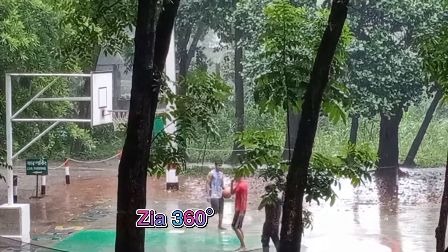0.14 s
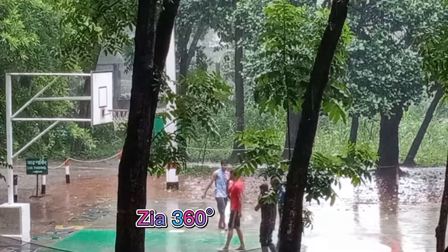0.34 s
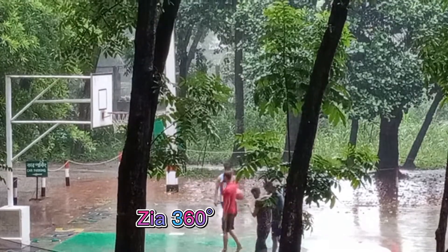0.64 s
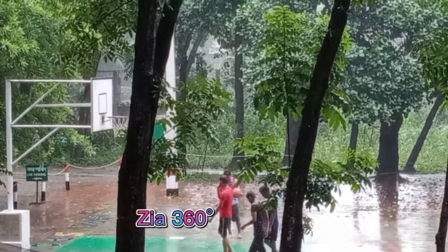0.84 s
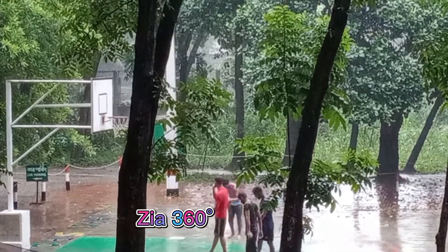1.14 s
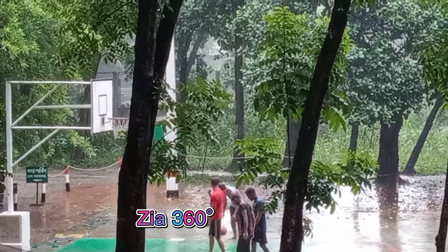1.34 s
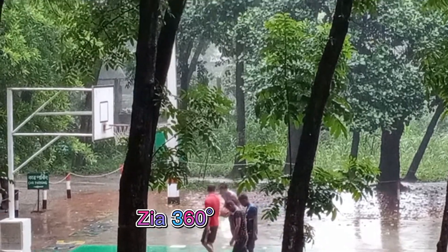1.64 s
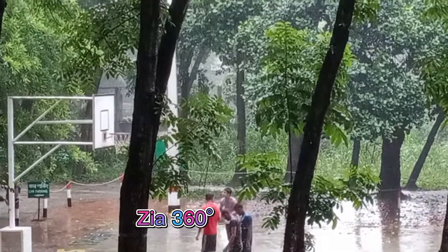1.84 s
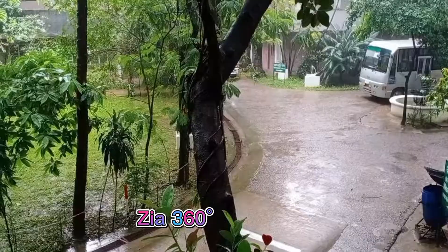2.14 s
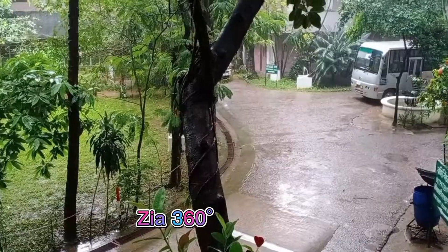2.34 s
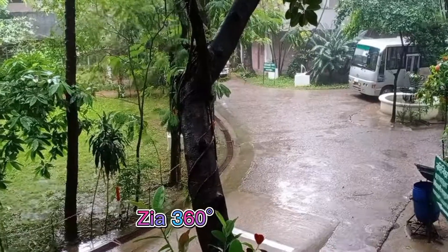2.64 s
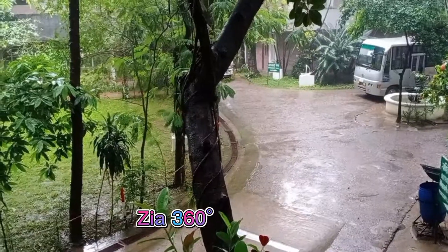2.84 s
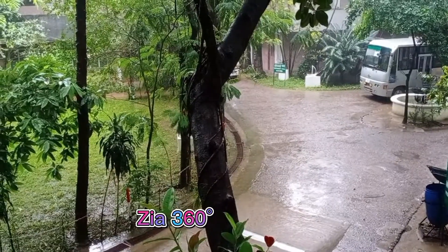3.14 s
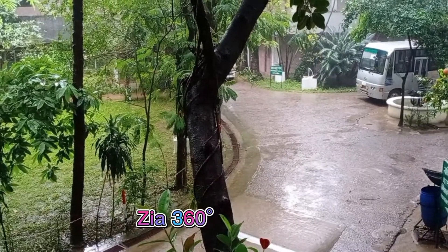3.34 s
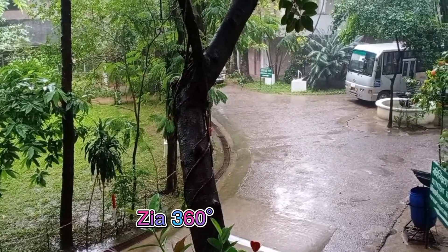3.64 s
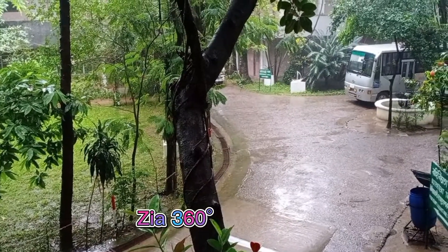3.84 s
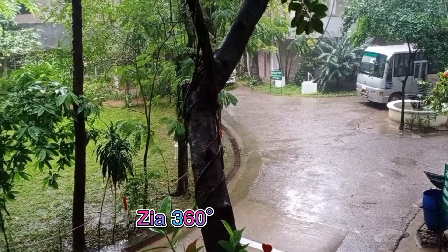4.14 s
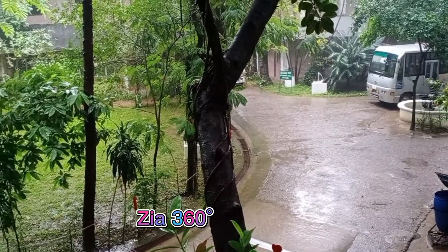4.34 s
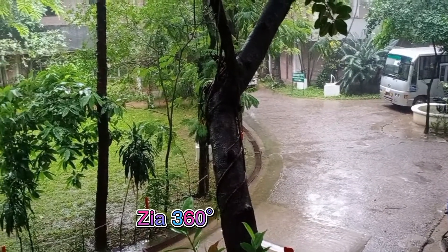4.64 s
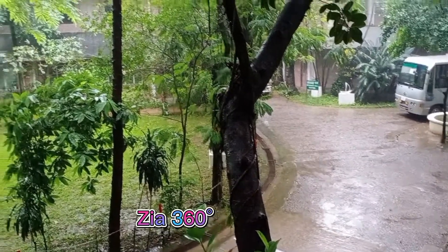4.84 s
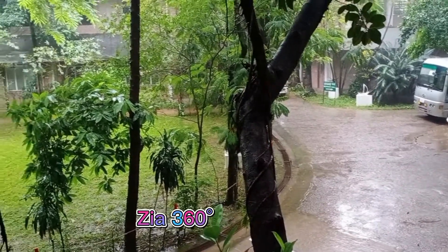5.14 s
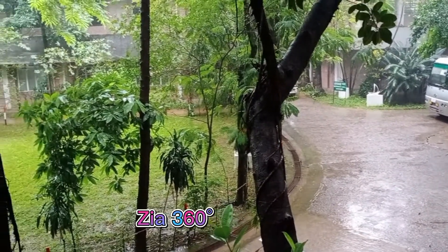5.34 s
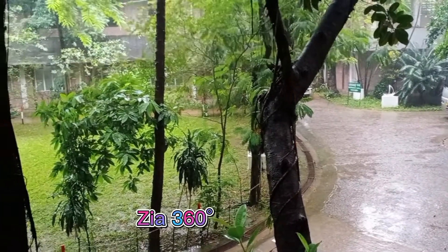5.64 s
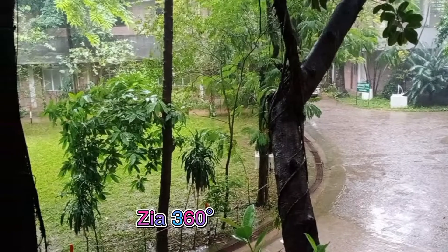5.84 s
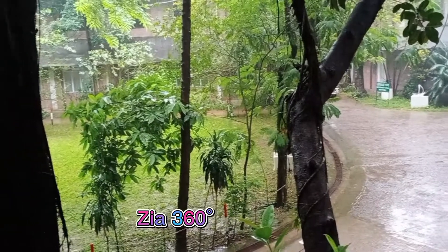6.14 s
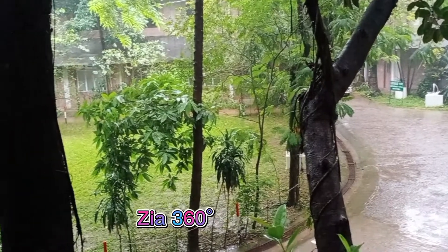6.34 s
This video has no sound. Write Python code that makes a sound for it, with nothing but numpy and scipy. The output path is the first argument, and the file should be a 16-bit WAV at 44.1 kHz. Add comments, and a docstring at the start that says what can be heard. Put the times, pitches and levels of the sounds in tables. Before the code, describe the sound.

Torrential rain fills the whole stretch of about 6.4 seconds without pause, equal in both channels. At first, beside a flooded court, a bright, airy hiss of drops on leaves covers a fine watery babble and a dark, distant roar. A fat drip smacks sharply near the microphone at 0.2, the loudest of all; small plops follow. At about 1.2 a faint hollow knock sounds across the court with quick echoes and a faint tail, near a light slap. At 1.7 the place changes abruptly to a driveway: the hiss grows a little louder with less airy top, the bubbling deeper and fuller. Close drips tick at 2.0, 2.5, 3.1, 4.2 and 4.5. Wet slaps cluster between 2.0 and 2.9, then return sparsely near 3.8, 4.8, 5.7 and 6.2. Rounded plops crowd around 5.6 to 5.8. Soft dull bumps lie underneath, and rain continues to the end.

```python
"""Torrential rain hisses all around in a garden: first beside a flooded ball court, then beside a driveway. The
hiss is noise and random ticks shaped like wet leaves; bubbles ringing in many bands babble in standing water.
Close to the microphone fat drips smack leaves, big bubbles plop, and heavy drops slap and splat on wet ground.
Farther off, bands of noise make a dark roar, short low tones bump dully, puddles glug now and then, and three
ringing modes knock once across the court, with echoes. Both channels are alike."""
import sys
import numpy as np
from scipy import signal
from scipy.fft import rfft, irfft, next_fast_len
from scipy.io import wavfile

SR = 44100
rng = np.random.default_rng(int(sys.argv[2]) if len(sys.argv) > 2 else 0)


def inscribe(sig):
    """Save sig as 16-bit PCM at rate SR to the path in sys.argv[1].

    A 1-D sig is mono; a 2-D sig holds one channel per row.
    Samples are clipped to [-1, 1] before scaling.
    """
    pcm = np.round(np.clip(np.atleast_2d(sig).T, -1, 1) * 32767)
    wavfile.write(sys.argv[1], SR, pcm.astype(np.int16))


N = 285311   # length in samples
STEP = 100   # samples between ticks
TICKS = np.arange(0, N + STEP, STEP) / SR   # the times in seconds at which slow controls are worked out
HALF_SECOND = SR // 2   # in samples
MOVE_S = 1.695   # the listening place changes from court to driveway

# Far roar of rain on the ground. Each row: frequency in Hz, level in dB per Hz before the trim for each place.
ROAR_SPECTRUM = [(40, -95), (60, -95), (95, -87), (140, -86), (230, -84.5), (350, -85), (480, -88),
                 (700, -84), (1400, -90.5)]
# Dull bumps underneath, and a few low glugs in the puddles (the rows near 300-420 Hz). # Each row: start in
# seconds, peak level in dB, length in seconds, middle pitch in Hz.
DULL_BUMPS = [(0.079, -54, .1, 90), (0.27, -50, 0.041, 90), (0.731, -55, 0.07, 85),
              (0.746, -47, 0.054, 402), (1.169, -39.5, 0.038, 99), (1.247, -48, 0.064, 106),
              (1.595, -48, 0.028, 115), (1.882, -45, .05, 330), (3.055, -43, 0.12, 230),
              (3.16, -38.5, 0.038, 105), (3.188, -44, 0.066, 110), (3.228, -48, 0.054, 174),
              (3.256, -43.5, 0.036, 90), (3.398, -43, 0.05, 104), (3.434, -48, 0.05, 317),
              (3.888, -45.5, 0.086, 226), (4.674, -47, 0.045, 122), (4.79, -43, 0.031, 162),
              (4.807, -46, 0.058, 109), (4.868, -40, 0.036, 157), (5.348, -40.5, 0.04, 93),
              (5.358, -44, 0.032, 168), (5.46, -50, 0.049, 115), (5.613, -50, 0.053, 95),
              (6.003, -48, 0.082, 321), (6.277, -46.5, 0.065, 169), (6.28, -50, 0.15, 100.5)]
# The hollow knock across the court: its start, and how hard it sets the modes ringing.
KNOCK_S, KNOCK_DRIVE_DB = 1.1762, -25.5
# Modes of the knocked body. Each row: pitch in Hz, relative level in dB, time to fall by 60 dB in seconds.
HOLLOW_MODES = [(1110, -1, 0.05), (1200, -4, 0.021), (1320, 2, 0.025)]
# Echoes of the knock. Each row: delay in seconds, level in dB relative to the knock.
WALL_ECHOES = [(0.015, -10), (.025, -11), (0.039, -11), (.057, -9), (.083, -10), (.097, -12), (0.106, -10)]

# Big bubbles in puddles. Each row: start in seconds, peak level in dB, middle pitch in Hz, length in seconds.
PUDDLE_PLOPS = [(0.26, -41, 1170, 0.027), (.4, -50, 846, 0.046), (.59, -44.5, 1027, 0.05),
                (.665, -41, 1630, .03), (0.732, -53.5, 1080, 0.17), (0.822, -39, 1580, 0.039),
                (0.822, -46.5, 796, 0.047), (0.924, -47, 884, .06), (1.206, -37, 1110, 0.026),
                (1.29, -48, 604, 0.037), (1.591, -39, 1457, .035), (1.743, -41, 899, 0.04),
                (1.89, -36.5, 1159, .05), (2.611, -36, 1293, 0.035), (2.82, -39, 1665, .04),
                (3.11, -42, 1034, .04), (3.197, -37, 960, .05), (3.473, -36, 1003, .05),
                (3.54, -40, 1291, 0.044), (4.31, -39, 1679, .04), (4.327, -44, 738, 0.1),
                (4.389, -36, 1240, 0.029), (4.788, -36, 1012, .04), (4.851, -34, 1755, 0.033),
                (5.149, -38, 956, 0.037), (5.33, -38.5, 748, 0.088), (5.409, -38, 1570, 0.038),
                (5.6, -35, 960, 0.034), (5.675, -33, 1180, 0.058), (5.722, -35.5, 914, 0.065),
                (5.788, -33, 877, 0.024), (5.985, -35, 1830, 0.024), (6.403, -35, 1234, 0.035)]
# The heaviest drops on wet ground. Each row: start in seconds, peak level in dB, pitch in Hz,
# time in seconds for the spatter to fall by 60 dB.
GROUND_SLAPS = [(1.232, -33, 1380, .04), (1.96, -28.5, 1340, 0.095), (2.109, -25, 1370, 0.036),
                (2.349, -29, 1250, 0.035), (2.556, -29, 1750, 0.11), (2.658, -24, 1710, .07),
                (2.663, -24.5, 1260, 0.34), (2.747, -25, 1540, .06), (2.873, -28, 1330, .03),
                (3.754, -30, 1370, .07), (4.493, -30, 1325, .03), (4.828, -25, 1270, 0.071),
                (5.718, -25.5, 1390, .07), (6.202, -28.5, 1130, 0.061)]

# Bubbles in the standing water at each place. Each row: frequency in Hz, level in dB per Hz before the slow fades.
COURT_WATER_SPECTRUM = [(550, -84), (800, -71.5), (1080, -73.5), (1250, -75), (1580, -70.5), (1900, -74.5),
                        (2200, -73), (2900, -77.5), (3400, -80.5)]
DRIVE_WATER_SPECTRUM = [(550, -71.5), (750, -71), (950, -70.5), (1280, -66), (1780, -70.5), (2100, -75.5),
                        (2550, -77), (3400, -77.5)]
# Spells in which the babble reaches deeper (-) or thins out (+).
# Each row: middle in seconds, length in seconds, shift of the babble's lower edge in octaves.
BABBLE_SPELLS = [(0.453, 0.2, -0.58), (0.75, 0.22, 0.4), (0.93, 0.22, 0.34), (1.1, .12, -.12),
                 (1.287, 0.065, -0.32), (1.77, .08, -.25), (1.984, 0.25, -0.26), (2.196, .1, 0.55),
                 (2.93, 0.1, 0.5), (3.527, .12, -0.34), (4.666, 0.29, 0.33), (4.935, 0.15, 0.23),
                 (5.68, .09, -.2), (5.82, .18, .14), (6.41, .14, -.25)]
COURT_BABBLE_DB, DRIVE_BABBLE_DB = 0.0, -0.29   # trim at each place
COURT_EDGE_HZ, DRIVE_EDGE_HZ = 1050, 744   # the babble's lower edge: below this pitch it fades steeply
EDGE_WANDER_OCTAVES, EDGE_WANDER_HZ = 0.053, 7.7   # that edge wanders by chance, about this often a second
# The small, high bubbles are fuller for a while, around this moment.
FIZZ_S, FIZZ_SPREAD_S, FIZZ_DB, FIZZ_ABOVE_HZ = 1.82, 0.32, 2.5, 1600

# Fat drips close by. Each row: start in seconds, peak level in dB before flicker and hollows.
CLOSE_DRIPS = [(0.0252, -27), (0.2205, -12.5), (0.7841, -25.5), (0.9971, -29), (1.1634, -28), (1.1706, -24),
               (1.5403, -28), (2.0436, -21.5), (2.5233, -27), (2.5458, -20.5), (3.0562, -25),
               (3.1345, -23.5), (3.1395, -24), (3.9654, -27), (4.1843, -22), (4.1898, -24), (4.4106, -22),
               (4.5496, -22), (4.9096, -27), (6.3546, -26)]
# Colour of the rain on the leaves at each place. Each row: frequency in Hz, relative level in dB per Hz.
COURT_LEAF_SPECTRUM = [(1500, -29.5), (2400, -15.5), (3300, -8.5), (3800, -4.5), (5000, -7.5), (5800, -3),
                       (6700, -4), (7800, -16), (9200, -32), (10200, -29.5), (11400, -33.5), (13000, -21),
                       (15500, -22)]
DRIVE_LEAF_SPECTRUM = [(1500, -39), (2700, -21), (3500, -4.5), (4900, -2), (5600, 0.5), (6400, -7.5),
                       (7500, -21), (8700, -33.5), (9350, -55.5), (10800, -35), (11400, -38.5),
                       (12500, -27.5), (15500, -37)]
COURT_HISS_DB, DRIVE_HISS_DB = -39, -35.5   # middle level at each place
# Hiss and babble swell a little together, about this often a second.
SWELL_HZ, HISS_SWELL_DB, BABBLE_SWELL_DB = 1, 0.36, 0.15

CUTOFF_HZ = 15600   # top of the recorded range


def from_db(db):
    """Decibels to gain."""
    return 10 ** (np.asarray(db) / 20)


def rms_one(x):
    """Scale to rms 1."""
    return x / np.sqrt(np.mean(x ** 2) + 1e-20)


def at_hz(points, hz):
    """Read a spectrum on a log-frequency axis."""
    table_hz, table_db = np.array(points).T
    return np.interp(np.log(np.maximum(hz, 1)), np.log(table_hz), table_db)


def colour(x, spectrum):
    """Causal (minimum-phase) filter: the spectrum's cepstrum is folded onto positive time."""
    size = 2 * next_fast_len(N // 2 + SR // 10, real=True)
    freqs = np.arange(size // 2 + 1) * SR / size
    cepstrum = irfft(np.log(from_db(at_hz(spectrum, freqs))))
    cepstrum[1:size // 2] *= 2
    cepstrum[size // 2 + 1:] = 0
    return irfft(rfft(x, size) * np.exp(rfft(cepstrum)))[:N]


def narrow(x, hz, width):
    """A resonance with steep skirts; its power is 1 per Hz of width."""
    edges = [max(hz - width / 2, 10), hz + width / 2]
    band = signal.sosfilt(signal.butter(2, edges, "band", fs=SR, output="sos"), x)
    return np.sqrt(width) * rms_one(band)


def bands(low, high, count):
    """Centres and widths of adjoining bands that widen with pitch."""
    edges = np.linspace(np.sqrt(low), np.sqrt(high), count + 1) ** 2
    return zip((edges[:-1] + edges[1:]) / 2, np.diff(edges))


def drift(rate):
    """Slow chance of rms 1 at every tick, changing about rate times a second: noise through two equal poles."""
    r = np.exp(-2 * np.pi * rate * STEP / SR)
    slow = signal.lfilter([1], [1, -2 * r, r * r], rng.standard_normal(2 * len(TICKS)))
    return rms_one(slow[len(TICKS):])   # the first half lets the filter settle


def fader(db):
    """A level at every tick becomes a gain at every sample, joined by straight lines."""
    gain = from_db(db)
    ramp = np.arange(STEP) / STEP
    return (gain[:-1, None] + np.diff(gain)[:, None] * ramp).ravel()[:N]


def by_place(moved, court, drive):
    """Blend a setting from its value at the court to its value at the driveway."""
    return (1 - moved) * court + moved * drive


def dying(t60):
    """A decay from 1, half a second long, falling by 60 dB in t60 seconds."""
    return from_db(-60 * np.arange(HALF_SECOND) / (t60 * SR))


def ring(clicks, hz, t60):
    """A unit click sets a damped sine of starting height 1 ringing."""
    r, w = from_db(-60 / (t60 * SR)), 2 * np.pi * hz / SR
    # the tiny offset keeps the filter away from vanishing numbers
    return signal.lfilter([0, np.sin(w)], [1, -2 * r * np.cos(w), r * r], clicks + 1e-18)


def strikes(rows):
    """One click for each (s, dB)."""
    out = np.zeros(N)
    for s, db in rows:
        out[round(s * SR)] += from_db(db)
    return out


def impacts(per_s, spread_db):
    """Drops land at random; most are small, a few large, with sizes in dB spread exponentially."""
    chance = rng.random(N)
    hit = np.flatnonzero(chance < per_s / SR)
    size = np.minimum(-np.log(chance[hit] * SR / per_s + 1e-12), 5)
    out = np.zeros(N)
    out[hit] = from_db(spread_db * size) * (-1.) ** hit   # odd samples push the other way
    return out


def add(out, s, db, sound):
    """Mix a short sound in at time s with the given peak level."""
    start = round(s * SR)
    out[start:start + len(sound)] += (from_db(db) * sound / np.abs(sound).max())[:N - start]


def roar(level_db, patchy_db, swell_rate):
    """A dark, far roar: bands of noise, each swelling on its own."""
    out = np.zeros(N)
    for hz, width in bands(40, 1400, count=14):
        band_db = level_db + at_hz(ROAR_SPECTRUM, hz) + patchy_db * drift(swell_rate)
        out += narrow(rng.standard_normal(N), hz, width) * fader(band_db)
    return out


def bumps(rumble_db, above, width_share, peak_share, waver_share):
    """Soft blows and low puddle glugs: a wavering tone swells quickly and dies, with a broad rumble centred
    just above it."""
    out = np.zeros(N)
    samples = np.arange(HALF_SECOND)
    for s, db, length, hz in DULL_BUMPS:
        age = np.interp(samples / SR / length, [0, peak_share, 1], [0, 1, 2])   # 1 at the peak, 2 at the end
        waver = np.interp(samples / STEP, np.arange(len(TICKS)), drift(30))
        pitch = hz * (1 + waver_share * waver)
        tone = np.sin(2 * np.pi * np.cumsum(pitch) / SR)
        rumble = narrow(rng.standard_normal(SR), above * hz, width_share * hz)
        rumble = rms_one(rumble)[HALF_SECOND:]   # once the filter has settled
        add(out, s, db, np.sin(np.pi * age / 2) * (tone + from_db(rumble_db) * rumble))
    return out


def knock(tail_db, tail_t60):
    """A hollow body's modes ring, thrown back by walls and scattered by the trees into a dense tail of noise."""
    echoes = [(KNOCK_S + delay, KNOCK_DRIVE_DB + db) for delay, db in WALL_ECHOES]
    hits = strikes([(KNOCK_S, KNOCK_DRIVE_DB)] + echoes)
    body = sum(from_db(db) * ring(hits, hz, t60) for hz, db, t60 in HOLLOW_MODES)
    tail_fade = signal.fftconvolve(strikes([(KNOCK_S, tail_db)]), dying(tail_t60))[:N]
    tail = tail_fade * rng.standard_normal(N)
    return signal.sosfilt(signal.butter(4, [1000, 1470], "band", fs=SR, output="sos"), body + tail)


def plops(rise_share, glide_share):
    """Heavy drops leave big bubbles in puddles; each swells up and fades, its pitch creeping upwards."""
    out = np.zeros(N)
    for s, db, hz, length in PUDDLE_PLOPS:
        age = np.arange(round(length * SR)) / (length * SR)
        swell = np.sin(np.pi / 2 * np.interp(age, [0, rise_share, 1], [0, 1, 2]))
        pitch = hz * (1 + glide_share * (age - .5))
        add(out, s, db, swell * np.sin(2 * np.pi * np.cumsum(pitch) / SR))
    return out


def slaps(spatter_db, width_share):
    """A heavy drop lands with a hollow pop, then its spatter falls back around it as dying noise."""
    out = np.zeros(N)
    for s, db, hz, t60 in GROUND_SLAPS:
        splash = from_db(spatter_db) * dying(t60) * rng.standard_normal(HALF_SECOND)
        splash[0] = 1   # the landing itself
        add(out, s, db, narrow(splash, hz, width_share * hz))
    return out


def splats(moved, per_s, spread_db, court_db, drive_db):
    """Heavy drops at random slap the wet ground with a short, hollow pop."""
    pop_band = signal.butter(2, [1080, 1520], "band", fs=SR, output="sos")
    pops = signal.sosfilt(pop_band, impacts(per_s, spread_db))
    return rms_one(pops) * fader(by_place(moved, court_db, drive_db))


def babble_edge(moved):
    """Lower edge of the babble in Hz: its place's pitch, a slight wander and a rounded arch for each spell."""
    octaves = EDGE_WANDER_OCTAVES * drift(EDGE_WANDER_HZ)
    for middle, length, shift in BABBLE_SPELLS:
        from_middle = 2 * (TICKS - middle) / length
        octaves = octaves + shift * np.sqrt(np.maximum(1 - from_middle ** 2, 0))
    return by_place(moved, COURT_EDGE_HZ, DRIVE_EDGE_HZ) * 2 ** octaves


def bubbles(moved, swell_db, per_s, spread_db, patchy_db, flurry_rate, edge_db_per_octave, ragged_octaves):
    """Drops trap bubbles of many sizes; each size rings in its own band and comes in flurries."""
    edge_hz = babble_edge(moved)
    fizz_db = FIZZ_DB * np.exp(-((TICKS - FIZZ_S) / FIZZ_SPREAD_S) ** 2)
    out = np.zeros(N)
    for hz, width in bands(520, 3400, count=40):
        place_db = by_place(moved, at_hz(COURT_WATER_SPECTRUM, hz), at_hz(DRIVE_WATER_SPECTRUM, hz))
        place_db = place_db + fizz_db * (hz > FIZZ_ABOVE_HZ)
        # below the edge the babble fades steeply; a ragged drift lets low patches through now and then
        above_edge = np.log2(hz / edge_hz) + ragged_octaves * drift(flurry_rate)
        fade_db = edge_db_per_octave * np.minimum(above_edge, 0)
        # lulls go deeper than flurries rise
        flurry_db = patchy_db * np.minimum(drift(flurry_rate), 1)
        rings = narrow(impacts(per_s, spread_db), hz, width)
        out += rings * fader(place_db + swell_db + fade_db + flurry_db)
    return out


def drips(spectrum, leaf_db, leaf_hz, leaf_t60, spray_db, spray_t60):
    """Each fat drip smacks a leaf, which rings very briefly at its own pitch; then its spray falls back."""
    tick = colour(strikes([(0.0007, 0)]), spectrum)[:SR // 20]
    seconds = np.arange(HALF_SECOND) / SR
    out = np.zeros(N)
    for s, db in CLOSE_DRIPS:
        hz = leaf_hz * 2 ** rng.uniform(-.2, .2)
        leaf = from_db(leaf_db) * dying(leaf_t60) * np.cos(2 * np.pi * hz * seconds)
        spray = from_db(spray_db) * dying(spray_t60) * rng.standard_normal(HALF_SECOND)
        smack = leaf + spray
        smack[0] = 1   # the first touch
        add(out, s, db, signal.fftconvolve(smack, tick))
    return out


def leaves(spectrum, per_s, spread_db, far_db, flutter_db):
    """Near drops tick on the leaves over the smooth noise of far ones, all coloured by the foliage."""
    patter = rms_one(impacts(per_s, spread_db)) + from_db(far_db) * rng.standard_normal(N)
    return rms_one(colour(patter, spectrum)) * fader(flutter_db * drift(5.2))


def flicker(x, above_hz, depth_db, rate):
    """The top treble flickers: its level alone follows a quick drift."""
    top = signal.sosfiltfilt(signal.butter(4, above_hz, "high", fs=SR, output="sos"), x)
    return x + top * (fader(depth_db * drift(rate)) - 1)


def hollows(x, depth_db, rate, rise_limit):
    """Between babble and hiss the rain is thin: narrow ranges of pitch dip briefly, each on its own."""
    size = next_fast_len(N + SR // 10, real=True)
    freqs = np.arange(size // 2 + 1) * SR / size
    whole, out = rfft(x, size), x.copy()
    for hz, width in bands(1950, 3650, count=9):
        triangle = np.maximum(1 - np.abs(freqs - hz) / width, 0)
        band = irfft(whole * triangle, size)[:N]
        gain = rms_one(fader(depth_db * np.minimum(drift(rate), rise_limit)))
        out += band * (gain - 1)
    return out


def scene():
    """Leaves, standing water and far roar, with drips, plops, slaps, bumps and the knock on top."""
    moved = np.interp(TICKS, [MOVE_S - .01, MOVE_S + .01], [0, 1])   # 0 at the court, 1 at the driveway
    swell = drift(SWELL_HZ)
    hiss_db = by_place(moved, COURT_HISS_DB, DRIVE_HISS_DB) + HISS_SWELL_DB * swell
    babble_db = by_place(moved, COURT_BABBLE_DB, DRIVE_BABBLE_DB) + BABBLE_SWELL_DB * swell

    far = roar(-2.5 + 2.26 * moved, patchy_db=3.5, swell_rate=8.2)
    blows = bumps(rumble_db=-9, above=1.2, width_share=1.2, peak_share=0.39, waver_share=0.077)
    blows += knock(tail_db=-22, tail_t60=0.82)
    drops = plops(rise_share=0.19, glide_share=0.022) + slaps(spatter_db=-12, width_share=0.55)

    water = splats(moved, per_s=170, spread_db=0.9, court_db=-63.0, drive_db=-46.5)
    water += bubbles(moved, babble_db, per_s=700, spread_db=0.55, patchy_db=3.5, flurry_rate=6.9,
                     edge_db_per_octave=106, ragged_octaves=0.16)

    court = fader(hiss_db) * leaves(COURT_LEAF_SPECTRUM, per_s=6400, spread_db=2.0, far_db=0.0, flutter_db=0.65)
    court += drips(COURT_LEAF_SPECTRUM, leaf_db=-17, leaf_hz=6330, leaf_t60=.003, spray_db=-21, spray_t60=0.05)
    drive = fader(hiss_db) * leaves(DRIVE_LEAF_SPECTRUM, per_s=4200, spread_db=3.0, far_db=2.5, flutter_db=0.42)
    drive += drips(DRIVE_LEAF_SPECTRUM, leaf_db=-18, leaf_hz=5300, leaf_t60=.004, spray_db=-20, spray_t60=0.05)
    drive = flicker(drive, above_hz=11400, depth_db=2.5, rate=45)
    foliage = np.where(np.arange(N) < MOVE_S * SR, court, drive)

    rain = hollows(foliage + water, depth_db=3.0, rate=6.1, rise_limit=0.27)
    return np.tile(rain + drops + far + blows, (2, 1))   # both channels alike


def record(dry):
    """The top is cut steeply by an elliptic low-pass."""
    return signal.sosfilt(signal.ellip(10, .1, 70, CUTOFF_HZ, fs=SR, output="sos"), dry)


dry = scene()
out = record(dry)
inscribe(out)
```